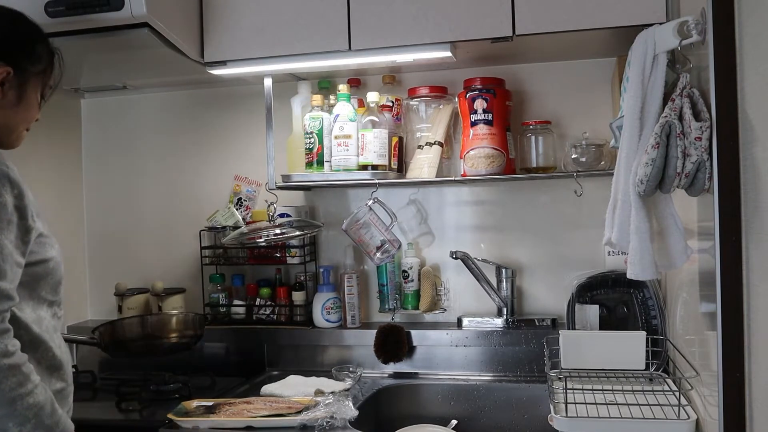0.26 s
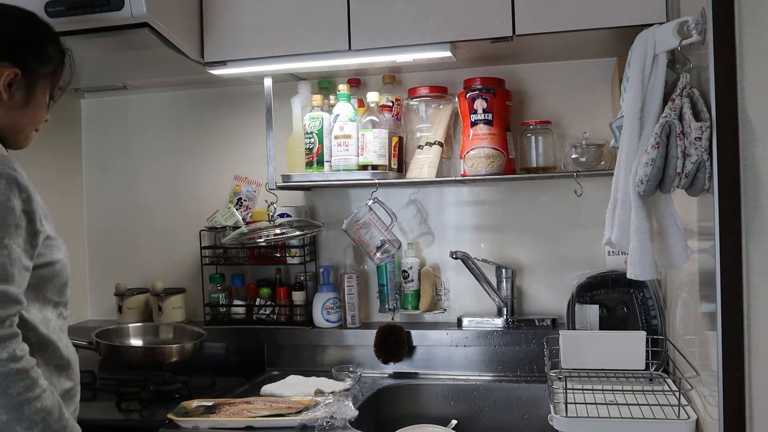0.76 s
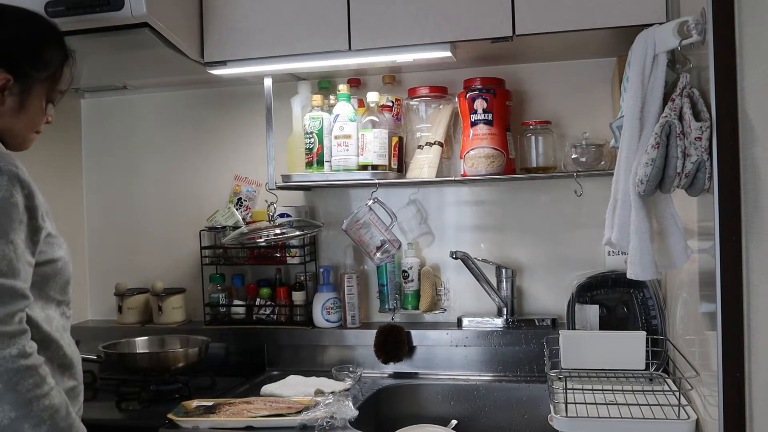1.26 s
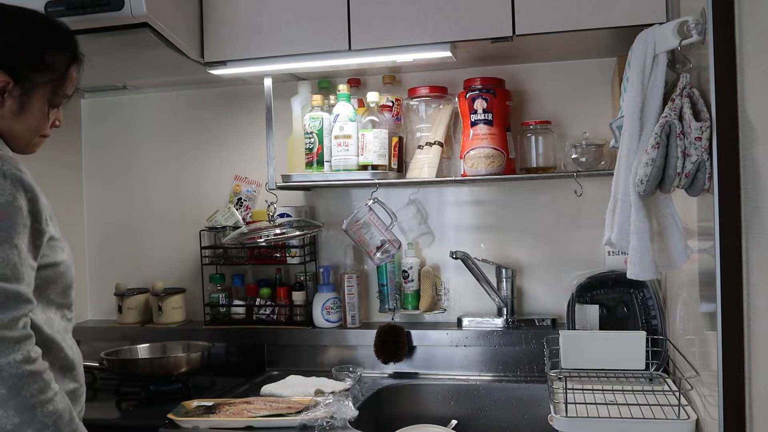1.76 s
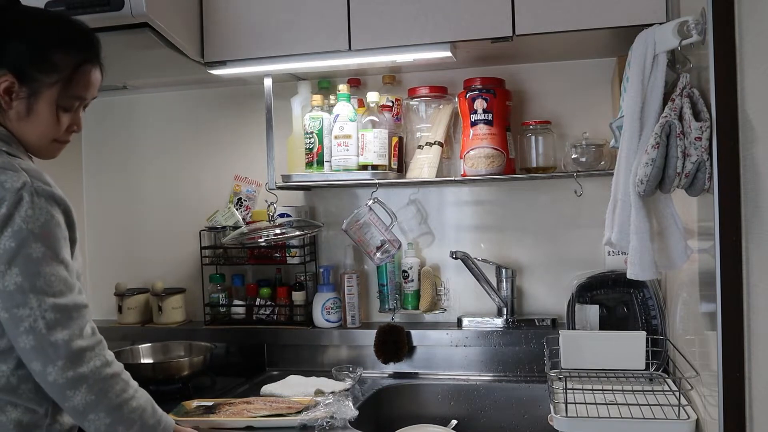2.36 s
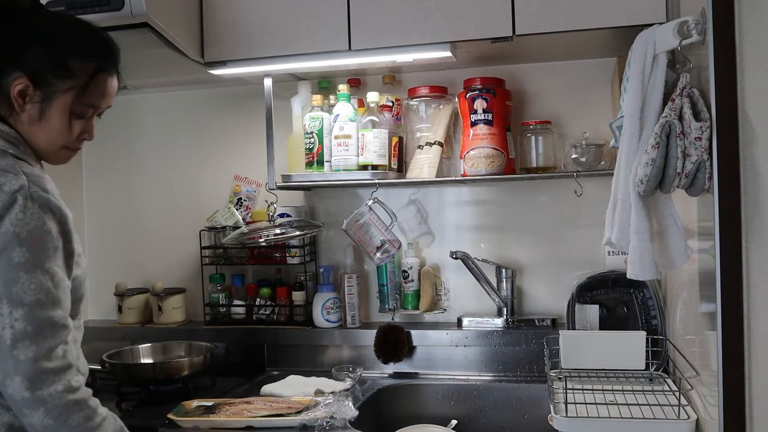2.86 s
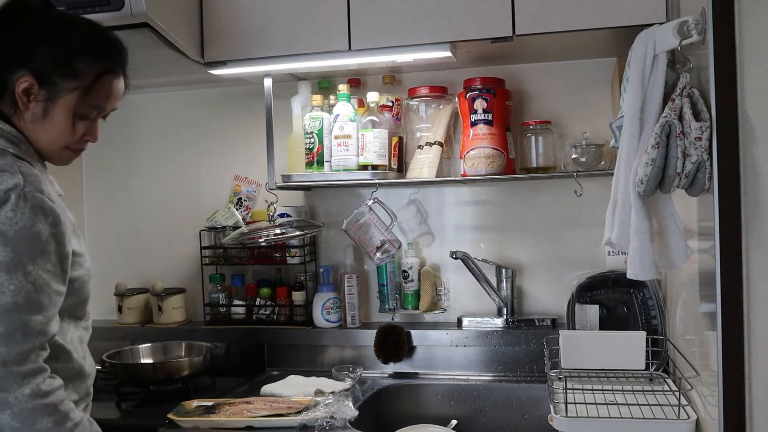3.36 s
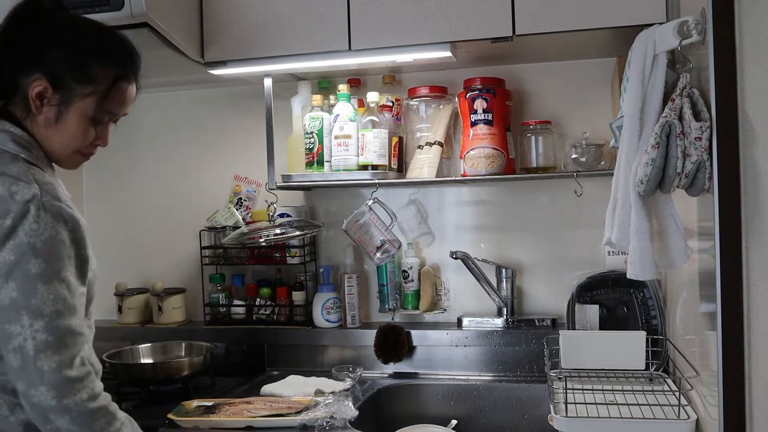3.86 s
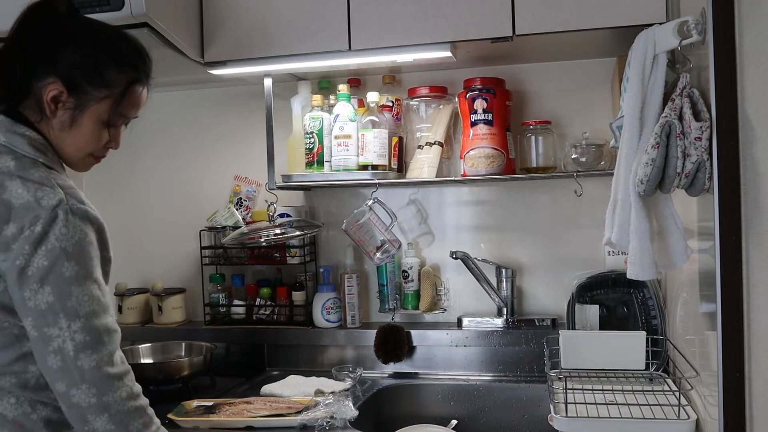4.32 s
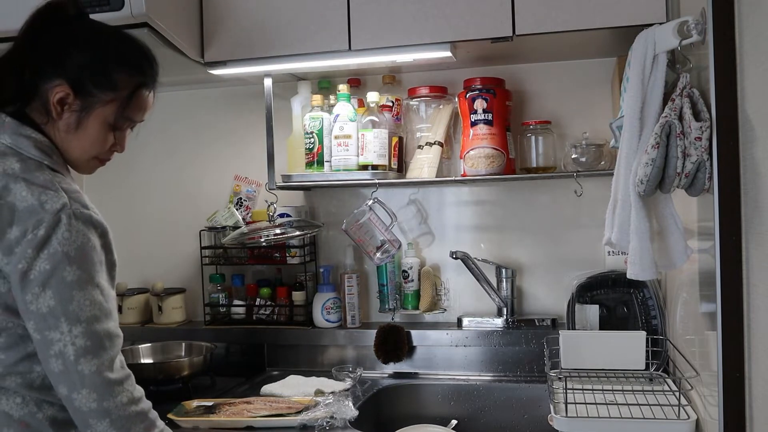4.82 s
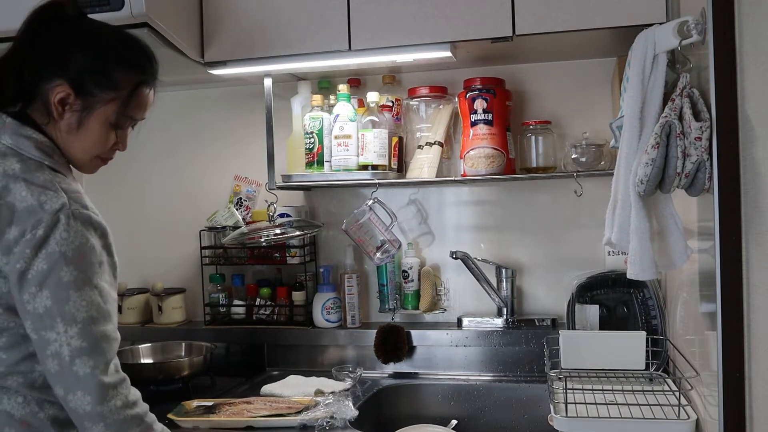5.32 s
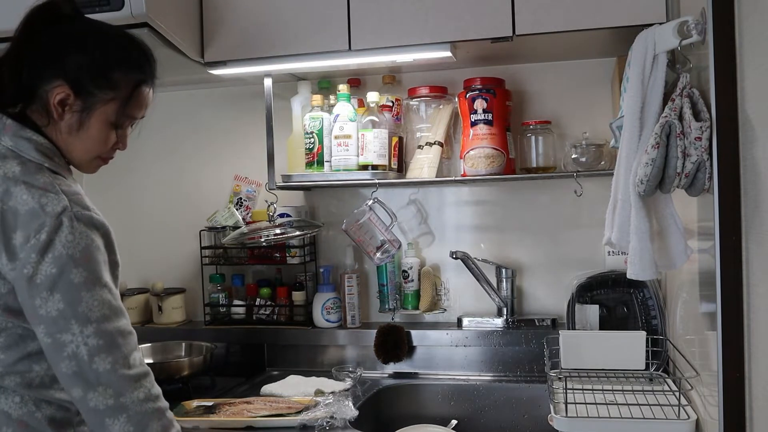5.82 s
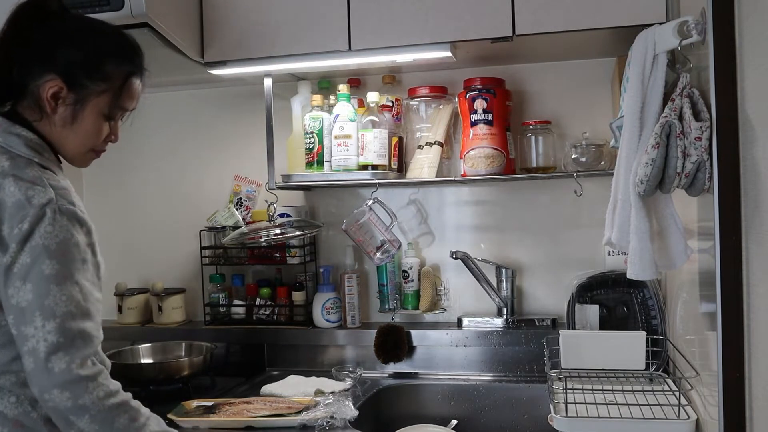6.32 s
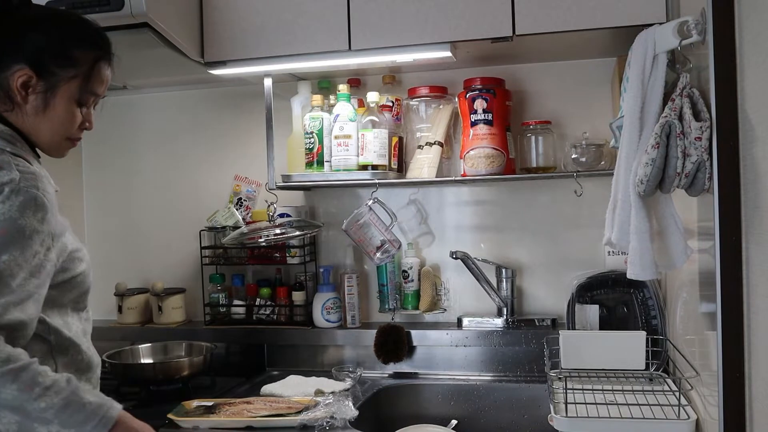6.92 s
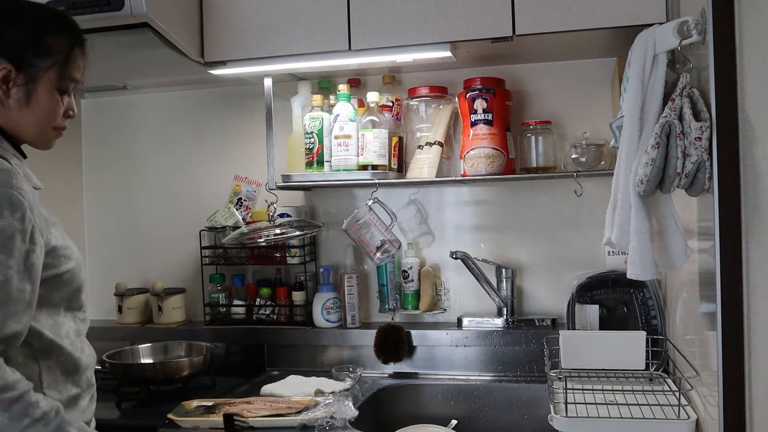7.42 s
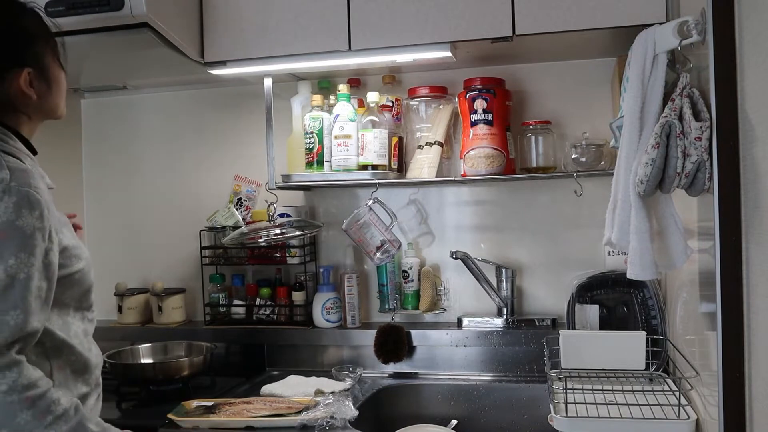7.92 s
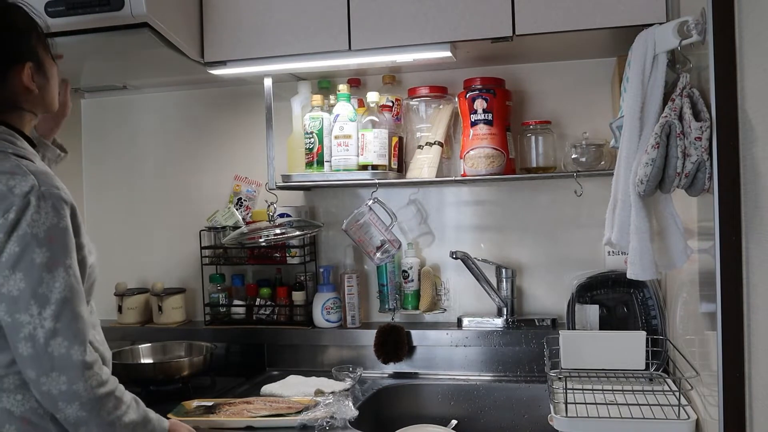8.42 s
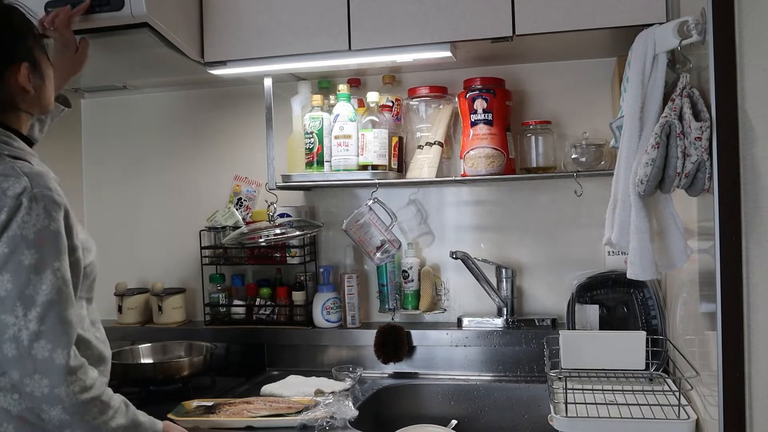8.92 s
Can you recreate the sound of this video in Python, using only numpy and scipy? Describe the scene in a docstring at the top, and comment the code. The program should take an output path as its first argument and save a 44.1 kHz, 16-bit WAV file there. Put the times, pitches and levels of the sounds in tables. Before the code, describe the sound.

Pan clanks and scrapes onto a stove grate, drawer rumbles open, cutlery is rummaged, then a heavy closing thump and a fan switching on.

```python
"""A small hard-walled kitchen, heard by two close microphones over a faint hiss of appliances.
A steel pan is set on the hob grate, a deep drawer rolls open, utensils are rummaged and dropped in it,
it rolls shut with a thump and a switch starts the extractor fan. Blows are noise bursts that start decaying
modes; scrapes, rolling and air are shaped noise; squeaks and motor hum are sines; the room adds diffuse echo."""
import sys
import numpy as np
from scipy import signal
from scipy.fft import rfft, irfft, next_fast_len
from scipy.io import wavfile

SR = 44100
rng = np.random.default_rng(int(sys.argv[2]) if len(sys.argv) > 2 else 0)


def dump(signal):
    """Clip the signal to [-1, 1] and save it as 16-bit WAV at the path in sys.argv[1]."""
    limited = np.clip(np.atleast_2d(signal).T, -1, 1)
    pcm = np.round(limited * 32767).astype(np.int16)
    wavfile.write(sys.argv[1], SR, pcm)


N = 404838


def undb(db):
    """Decibel definition: 20 dB is a factor of ten in amplitude."""
    return 10 ** (np.asarray(db) / 20)


def on_log(table, hz):
    """Logarithmic pitch: interpolate a (frequency [Hz], value) table on a log-frequency axis."""
    at, value = np.transpose(table)
    return np.interp(np.log(np.maximum(hz, 1)), np.log(np.maximum(at, 1)), value)


def colour(x, table, size=4096):
    """Minimum phase: folding the cepstrum of a gain table gives a causal filter, scaled to unit power."""
    bins_hz = np.arange(size // 2 + 1) * SR / size
    cepstrum = irfft(np.log(undb(on_log(table, bins_hz))))
    cepstrum[1:size // 2] *= 2
    cepstrum[size // 2 + 1:] = 0
    taps = irfft(np.exp(rfft(cepstrum)))
    taps = taps / np.sqrt(np.sum(taps ** 2))
    return signal.oaconvolve(x, taps)[:len(x)]


def ring(x, modes):
    """Modal superposition: every push starts a decaying sine in each mode."""
    out = 0
    for hz, db, t60 in modes:
        radius, angle = np.exp(-np.log(1000) / (t60 * SR)), 2 * np.pi * hz / SR
        poles = [1, -2 * radius * np.cos(angle), radius * radius]
        out = out + signal.lfilter([0, undb(db) * np.sin(angle)], poles, x)
    return out


def cut(x, hz, kind):
    """Second-order Butterworth filtering: a maximally flat pass band."""
    return signal.sosfilt(signal.butter(2, hz, kind, fs=SR, output="sos"), x)


def gain_curve(s, db):
    """Piecewise exponential envelope: gain follows dB points and is practically silent outside them."""
    return undb(np.interp(np.arange(N) / SR, s, db, left=-150, right=-150))


def swell(s, db, rise_db_s, fall_db_s):
    """Exponential growth and decay: gain climbs to db at time s, then sinks, at steady dB per second."""
    t = np.arange(N) / SR - s
    return undb(db + np.where(t < 0, rise_db_s * t, -fall_db_s * t))


def grit(scatter_db):
    """Asperity contact: dense tiny impacts of very uneven size, with unit power."""
    x = rng.standard_normal(N) * undb(scatter_db * rng.exponential(size=N))
    return x / np.sqrt(np.mean(x ** 2))


def spread(x, table):
    """Interchannel coherence: weight the side part by frequency and advance it a quarter cycle."""
    size = next_fast_len(len(x))
    bins_hz = np.arange(size // 2 + 1) * SR / size
    return irfft(1j * rfft(x, size) * undb(on_log(table, bins_hz)), size)[:len(x)]


CONTACT_LAW = 0.31  # dB of longer contact for each dB of weaker blow
NOTE_DB, NOTE_Q = 3.5, 5  # broad band lifted around the note of the piece struck
BASE_HZ, BASE_SHARE = 2500, .25  # a resting pan's modes below this pitch keep this share of their t60
FLUTTER, FLUTTER_HZ = .75, 28  # depth of each mode's level flutter, and base of its rate
WAVER_RAD = .9  # loose contact makes the phase, and so the pitch, of each ring waver


def strike(blows, crack, modes, contact_s, crack_db, ring_db, rests_s=0, shares=(1, 1), under=(), rise_s=0.00038):
    """Impact excitation: each blow is a short rough contact; returns its crack and the ring of its modes.

    After rests_s the `under` modes join in; shares scale every t60 before and after that moment."""
    size = int(.7 * SR)
    own, modes = len(modes), list(modes) + list(under)
    cracks, rings = np.zeros(N + size), np.zeros(N + size)
    t = np.arange(size) / SR
    rough = rng.standard_normal(N + size)
    chance = rng.random((len(blows), 4, len(modes)))
    fade = np.minimum(1, 10 * (1 - t / t[-1]))
    rise = 1 - np.exp(-t / rise_s)
    for (s, db, thud_db, fizz_db, own_db, *note), (phase, spot, apart, lag) in zip(blows, chance):
        i, resting = int(s * SR), s > rests_s
        contact = max(contact_s, .001) * undb(-CONTACT_LAW * db)
        push = (rough[i:i + size] * rise * np.exp(-t / contact))[:size // 3]
        # a soft heavy contact has more thud, a hard light one more fizz
        low, high = cut(push, 356, "low"), cut(push, 2200, "high")
        push = push + (undb(thud_db) - 1) * low + (undb(fizz_db) - 1) * high
        for hz in note:
            band = signal.lfilter(*signal.iirpeak(hz, NOTE_Q, fs=SR), push)
            push = push + undb(NOTE_DB + own_db) * band
        cracks[i:i + len(push)] += undb(db + crack_db) * colour(push, crack)

        sounding = modes if resting else modes[:own]
        for (hz, mode_db, t60), turn, luck, gap, late in zip(sounding, phase, spot, apart, lag):
            damped_base = 0 < rests_s < s and hz < BASE_HZ
            t60 *= shares[resting] * (BASE_SHARE if damped_base else 1)
            # the spot that is hit favours some modes over others
            mode_db += 4 * (luck - .5) + thud_db * (hz < 400) + fizz_db * (hz > 3000)
            n = min(size, int(1.3 * t60 * SR))
            waver = WAVER_RAD * np.sin(2 * np.pi * (FLUTTER_HZ * (0.403 + late) * t[:n] + gap))
            decay = np.exp(-np.log(1000) * t[:n] / t60)
            tone = decay * np.sin(2 * np.pi * (hz * t[:n] + turn) + waver)
            tone *= 1 + FLUTTER * np.sin(2 * np.pi * (FLUTTER_HZ * (0.26 + .75 * gap) * t[:n] + late))
            rings[i:i + n] += undb(db + ring_db + own_db + mode_db) * tone * rise[:n] * fade[:n]
    return np.array([cracks[:N], rings[:N]])


# Spectrum of the hiss, common to both microphones: (frequency [Hz], relative density [dB per Hz])
HISS_MID = [(12, -59), (20, -10.5), (59, 1.5), (112, -2.5), (251, -8), (280, -10.5), (331, -8),
            (370, -12.5), (610, -12.5), (926, -15), (2810, -22.5), (9830, -37.5), (15300, -51)]
# Side part of the hiss: (frequency [Hz], left minus right over the common part [dB])
HISS_SIDE = [(60, -24), (110, -16), (200, -2.5), (380, 3.5), (700, 4), (1280, 6), (2370, 5.5), (4370, 6.5),
             (8060, 6.5), (14900, 9)]
HISS_DB = -53.5
WHINE_HZ, WHINE_WIDTH_HZ, WHINE_DB = 2772, 31, -70


def hiss():
    """Stationary noise: steady hiss with a narrow whine; returns the common and left-minus-right parts."""
    whine = signal.iirpeak(WHINE_HZ, WHINE_HZ / WHINE_WIDTH_HZ, fs=SR)
    lift = undb(WHINE_DB) * np.sqrt(SR / (np.pi * WHINE_WIDTH_HZ))  # makes up for the narrow band
    mid, side = (undb(HISS_DB) * colour(rng.standard_normal(N), HISS_MID)
                 + lift * signal.lfilter(*whine, rng.standard_normal(N)) for _ in range(2))
    return mid, spread(side, HISS_SIDE)


# Blows on the drawer: (time [s], level [dB], thud [dB], fizz [dB], ring [dB])
# In all blow tables thud is the gain of the lows, fizz of the highs, ring of the modes.
DRAWER_BLOWS = [(0.594, -44.5, -20, 0, 14), (2.346, -39.5, 15, -24, 0), (2.36, -37, -6, -23, 3),
                (2.488, -25.5, 15.5, -12, -10), (2.57, -25.5, 7.5, -5, -4), (2.63, -21.5, 3.5, -5, -4),
                (2.655, -45, -3, -8, 1), (2.737, -13, -1, -16, -25), (2.775, -22.5, 8.5, 5, -12),
                (2.845, -45, -2, -3, -5), (2.872, -26, 10.5, -5, -12), (3.648, -40.5, -46, 6, 11.5),
                (7.865, -8.5, -1, -8, -9), (7.89, -12, -3.5, -7, -3), (8.0, -14.5, 3.5, -2, -7),
                (8.321, 4, -3, -2.5, -2), (8.342, -11.5, 1.5, -6, 0.5), (8.356, -6, -8, 0, 7.5),
                (8.372, -14, -4, 0, 9), (8.39, -38, 2, 1, 2)]
# Modes of the drawer box: (frequency [Hz], level [dB], t60 [s])
DRAWER_MODES = [(76.5, -7.5, 0.12), (76.6, 3.5, 0.38), (104.3, 0.5, 0.11), (121, 0, 0.07),
                (162.4, 8, 0.071), (218, 2.5, 0.092), (291.3, -1.5, 0.2), (352.6, -8.5, 0.19),
                (440, -19, 0.15), (518, -18, 0.17), (606, -10.5, 0.14), (704, -16, 0.28)]
# Spectrum of its contact: (frequency [Hz], relative density [dB per Hz])
DRAWER_CRACK = [(18, -3), (30, -7), (64, 7), (255, 1), (298, -3.5), (477, -11), (687, -11.5), (965, -19),
                (7980, -45), (15300, -57)]


def drawer_blows():
    """Panel resonance: knocks and the closing thump excite the low modes of the drawer box."""
    return strike(DRAWER_BLOWS, DRAWER_CRACK, DRAWER_MODES, contact_s=0.0066, crack_db=-4.0, ring_db=-11.0,
                  rise_s=0.0011)


# Blows of the pan: (time [s], level [dB], thud [dB], fizz [dB], ring [dB])
PAN_BLOWS = [(1.45, -31.5, -28, 2.5, 17), (1.461, -39.5, -19.5, 1.5, 15.5), (1.757, -13.5, -6.5, 0.5, 6),
             (1.766, -12, -9.5, -0.5, 2.5), (1.799, -11.5, 13, -3, -1), (1.929, -20, -12.5, 10, -11.5),
             (1.939, -3, -5.5, 4, -3.5), (1.965, -37.5, -20, 11, -12.5), (2.012, -23, -7, 3, 3.5),
             (2.047, -15.5, 7.5, -1.5, -1), (2.12, -28.5, -9.5, -13, 9.5)]
# Modes of the pan before support damping: (frequency [Hz], level [dB], t60 [s])
PAN_MODES = [(353, -0.5, 0.16), (667, -23.5, .8), (880, -14, .6), (1096, -13, 0.61), (1180, -17.5, .6),
             (1346, -22.5, .15), (1584, -16.5, .7), (2060, -10, 0.2), (2261, -3, .12), (2309, -1, .6),
             (2848, -17, .5), (3219, -11, .7), (3252, -15, .6), (3596, -7.5, .55), (3850, -18, .3),
             (4140, -5, .42), (4660, -6, .42), (5480, -17, .3), (5809, -11, .2), (7040, -14, .25),
             (9880, -30, 0.17), (11520, -31, 0.35), (11680, -36, 0.26)]
# Modes of the grate bars, which ring once the pan has landed: (frequency [Hz], level [dB], t60 [s])
BAR_MODES = [(2702, -12, .2), (3063, -12, .35), (3349, -6, .6), (4043, -8, .5), (4204, -8, .2),
             (4468, -18, 1.1), (4511, -22, .6), (4790, -20, .6), (5734, -7, .25), (6207, -12, .45),
             (6325, -14, .27), (7220, -17, .25), (8070, -15, .3), (10280, -20, .15), (10970, -18.5, 0.12),
             (12300, -25, .15)]
# Spectrum of steel on the grate: (frequency [Hz], relative density [dB per Hz])
PAN_CRACK = [(47, -59.5), (80, -33), (341, 13), (425, -6), (919, 11), (2530, 3), (3290, 6.5), (4700, -1.5),
             (5150, -5.5), (5900, -3), (12600, -23.5), (15300, -39.5)]
PAN_RESTS_S = 1.7
PAN_HELD_SHARE, PAN_REST_SHARE = .65, .85  # share of each t60 in the air, then on the grate


def pan_blows():
    """Support damping: the pan rings in the air, then the grate damps its base and rings with it."""
    return strike(PAN_BLOWS, PAN_CRACK, PAN_MODES, contact_s=0.0043, crack_db=-3.0, ring_db=-14.0,
                  rests_s=PAN_RESTS_S, shares=(PAN_HELD_SHARE, PAN_REST_SHARE), under=BAR_MODES, rise_s=0.001)


# Slides of the pan on the grate: (loudest time [s], scrape level [dB], hum level [dB])
SLIDES = [(1.54, -42.5, -49.5), (1.648, -43.5, -44.5), (1.814, -32, -46), (1.946, -34, -52.5),
          (2.058, -28.5, -42.5)]
# Spectrum of the scrape: (frequency [Hz], relative density [dB per Hz])
SCRAPE = [(150, 0.5), (400, 1.5), (1100, 6.5), (1700, 0.5), (2500, -1.5), (8000, -38.5)]
SLIDE_RISE_DB_S, SLIDE_FALL_DB_S = 200, 173
HUM_RISE_DB_S, HUM_FALL_DB_S = 196, 76
GRATE_HZ, GRATE_T60 = 213, 0.2
SCRAPE_RING_DB = -4  # the pan's modes, over the scrape


def pan_slides():
    """Sliding friction: the scrape of steel on iron keeps one low bar mode and the pan's modes going."""
    hum = ring(rng.standard_normal(N), [(GRATE_HZ, 0, GRATE_T60)])
    hum_gain = sum(swell(s, db, HUM_RISE_DB_S, HUM_FALL_DB_S) for s, _, db in SLIDES)
    scrape_gain = sum(swell(s, db, SLIDE_RISE_DB_S, SLIDE_FALL_DB_S) for s, db, _ in SLIDES)
    rub = grit(3.42)
    # rubbing damps the ring and evens it out
    rubbed = [(hz, min(db, -13), .45 * t60) for hz, db, t60 in PAN_MODES[1:]]
    pan = ring(scrape_gain * rub, rubbed) / ring(rub, rubbed).std()
    scrape = scrape_gain * colour(rub, SCRAPE)
    return hum_gain * hum / hum.std() + scrape + undb(SCRAPE_RING_DB) * pan


# Drawer on its runners, one list opening and one closing: (time [s], rumble level [dB])
ROLLS = [
    [(2.315, -73), (2.345, -30), (2.37, -43), (2.48, -33), (2.5, -29.5), (2.72, -28), (2.8, -28.5),
     (2.99, -31), (3.06, -36), (3.152, -46.5), (3.42, -68)],
    [(7.45, -73), (7.6, -42), (7.768, -30), (7.89, -25.5), (8.005, -26.5), (8.09, -30.5), (8.19, -33),
     (8.3, -33.5), (8.33, -41)],
]
# Spectrum of the rails: (frequency [Hz], relative density [dB per Hz])
RAIL_HISS = [(290, -19), (500, -23), (655, -12), (847, -9.5), (2760, -15.5), (10800, -34), (13000, -39),
             (15000, -101)]
RAIL_HISS_DB = -18.5  # over the rumble


def drawer_roll():
    """Rolling excitation: uneven rollers shake the modes of the drawer box while the rails hiss."""
    bumps = grit(3.3)
    box = ring(bumps, [(hz, db, 0.68 * t60) for hz, db, t60 in DRAWER_MODES])
    box /= np.sqrt(np.mean(box ** 2))
    rails = colour(grit(2.0), RAIL_HISS)
    gain = sum(gain_curve(*np.transpose(roll)) for roll in ROLLS)
    return gain * (box + undb(RAIL_HISS_DB) * rails)


# Plastic clicks of drawer and fan switch: (time [s], level [dB], thud [dB], fizz [dB], ring [dB])
CLICKS = [(2.364, -34.5, 2, -29, -14), (2.989, -34.5, -22, 3.5, -8), (8.748, -41, 10, 0, 3),
          (8.798, -22.5, 1, 6.5, 4.5), (9.065, -50.5, 3, 2.5, -2)]
# Modes of the clicking parts: (frequency [Hz], level [dB], t60 [s])
SWITCH_MODES = [(510, 5, 0.2), (716, 9, .3), (861, 10, .25), (1292, 2, .3), (2266, 0, .3), (2600, 3, .6),
                (4500, -3, .2)]
# Spectrum of the click: (frequency [Hz], relative density [dB per Hz])
SWITCH_CRACK = [(88, -43), (150, -13.5), (427, -6), (778, -2), (1150, -8.5), (2530, -16), (6290, -28),
                (10600, -25), (15300, -44)]


def clicks():
    """Impulsive contact: small plastic parts snap and ring faintly."""
    return strike(CLICKS, SWITCH_CRACK, SWITCH_MODES, contact_s=0.0041, crack_db=3.0, ring_db=-27.5, rise_s=0.0019)


# Blows of utensils: (time [s], level [dB], thud [dB], fizz [dB], ring [dB], note of the piece [Hz])
UTENSIL_BLOWS = [(3.917, -45, 4, -11, 3, 644), (4.771, -26, 3, 0, -3, 1080), (4.844, -6, 0, -1.5, -4, 580),
                 (4.872, -38, 18, -6.5, 4, 1140), (4.921, -15.5, 2.5, 11, -4, 2820),
                 (4.984, -13, -2.5, 5, -5.5, 2850), (5.02, -41, 16, -13, 3, 1940),
                 (5.477, -39.5, 14.5, -1, -5, 360), (5.537, -23.5, -12, -1, -13, 1040),
                 (5.654, -25, 1, -15, -2, 1130), (5.694, -29.5, -16, 7, 6, 555),
                 (5.729, -36.5, 7.5, -3, -5, 950), (5.805, -17, 7, 2, 1.5, 363),
                 (5.845, -17, 4, 10.5, -5, 354), (5.866, -12, -6, -12, -16, 644),
                 (5.913, -11, -6, -2, -2, 656), (5.97, -19, -29, -7, 6, 910), (5.977, -3, 3, 2, -0.5, 860),
                 (6.027, -27, -8, -8, 3, 890), (6.042, -21, -8, -9, 0, 820), (5.828, -16.5, -5, 2, 1, 2100),
                 (5.885, -32, -11, 2, 8, 3000), (5.932, -21, 1, -3, -11, 1000),
                 (6.235, -28.5, -9, -1, -11, 3000), (6.177, -24, 11, 10, 8, 353),
                 (6.21, -23.5, -16, 1, 8, 634), (6.356, -26.5, 6, 6.5, -10, 595),
                 (6.381, -28, -2, -20.5, -4, 1880), (6.405, -17, 6, -38, -3, 845),
                 (6.472, -23, -19, -8, -2, 795)]
# Modes of the utensils: (frequency [Hz], level [dB], t60 [s])
UTENSIL_MODES = [(237, 1.5, 0.066), (389.4, 6, 0.21), (560.7, 3.5, 0.34), (655, 6, 0.36), (803, -11, 0.59),
                 (920, 0, 0.39), (1059, 5.5, 0.2), (1320, -5.5, 0.17), (1710, -12.5, .3), (2030, -6, .25),
                 (2665, -0.5, 0.19), (3010, -7, 0.22)]
# Spectrum of their contact: (frequency [Hz], relative density [dB per Hz])
UTENSIL_CRACK = [(29, -73), (50, 1), (127, -11.5), (210, 1.5), (274, -8), (365, -2), (475, -7), (865, -6),
                 (1430, -8), (11200, -32.5), (15300, -52)]


def utensil_blows():
    """Modal impact: each piece dropped or knocked lifts a band around its own note."""
    return strike(UTENSIL_BLOWS, UTENSIL_CRACK, UTENSIL_MODES, contact_s=0.0032, crack_db=-1.0, ring_db=-22.0,
                  rise_s=0.0011)


# Blows of cutlery: (time [s], level [dB], thud [dB], fizz [dB], ring [dB])
CUTLERY_BLOWS = [(4.076, -17, 3, 13, -24), (4.104, -7.5, 3.5, 4.5, -6), (4.138, -6, -12, 9.5, -4.5),
                 (4.208, -36, 10, 14, 20.5), (4.451, -25, 1, 5.5, -3), (4.475, -9.5, 4.5, 4, -7.5),
                 (4.508, -29.5, 10, 11.5, 13.5), (4.575, -36, -10, 0, 6)]
# Modes of the cutlery: (frequency [Hz], level [dB], t60 [s])
CUTLERY_MODES = [(220, -6, .12), (371, -4, .15), (651, -1, .4), (735, -6, .3), (818, -12, .9), (880, 0, .3),
                 (960, -2, .3), (1109, -6, .44), (1696, -4, .3), (2035, -5, .2), (2315, -9, .25),
                 (2422, -6, .25), (2950, -9, .2), (10820, -19, .1), (10940, -16, .2), (11060, -17, .16),
                 (11190, -20, .1), (13280, -25, .16), (13450, -27, .12), (13630, -25, .16)]
# Spectrum of its contact: (frequency [Hz], relative density [dB per Hz])
CUTLERY_CRACK = [(29, -51), (50, -7), (649, 1), (697, -11), (865, 3.5), (1270, -10), (1650, -7),
                 (8420, -29.5), (11000, -25.5), (13900, -40), (15300, -111)]


def cutlery_blows():
    """Bar vibration: struck cutlery rings in many modes, some above 10 kHz."""
    return strike(CUTLERY_BLOWS, CUTLERY_CRACK, CUTLERY_MODES, contact_s=0.0037, crack_db=-2.5, ring_db=-19.0,
                  rise_s=0.0014)


# Utensils dragged over each other: (loudest time [s], level [dB])
DRAGS = [(4.131, -34.5), (4.471, -49), (4.802, -38), (4.838, -34.5), (5.7, -44), (5.82, -37),
         (5.855, -28.5), (6.15, -36)]
DRAG_RISE_DB_S, DRAG_FALL_DB_S = 236, 124


def rummage():
    """Friction noise: dense scratchy contacts, coloured like the single blows."""
    gain = sum(swell(s, db, DRAG_RISE_DB_S, DRAG_FALL_DB_S) for s, db in DRAGS)
    return colour(gain * grit(3.5), UTENSIL_CRACK)


# Edges dragged over the tray: (start [s], end [s], first pitch [Hz], last pitch [Hz], waver [Hz], level [dB])
SQUEAKS = [(5.69, 5.79, 1885, 1885, 15, -47), (5.725, 5.81, 942, 942, 12, -35),
           (5.86, 5.96, 2640, 2620, 50, -37), (5.97, 6.05, 1150, 800, 60, -24),
           (6.18, 6.28, 380, 900, 90, -36), (6.34, 6.47, 1870, 1820, 70, -47),
           (6.41, 6.58, 850, 820, 35, -41), (4.14, 4.21, 960, 930, 40, -29),
           (4.85, 4.9, 1130, 1130, 40, -28), (5.02, 5.08, 1995, 1995, 40, -42)]
SQUEAK_THROB_DB = 4


def squeaks():
    """Stick-slip: a dragged edge sings on one wavering note that swells and fades."""
    out = np.zeros(N)
    for start, end, first_hz, last_hz, width_hz, db in SQUEAKS:
        i, n = int(start * SR), int((end - start) * SR)
        waver, throb = cut(rng.standard_normal((2, SR // 2)), 90, "low")[:, -n:]
        hz = np.linspace(first_hz, last_hz, n) + width_hz * waver / waver.std()
        note = np.sqrt(2) * np.sin(2 * np.pi * np.cumsum(hz) / SR)
        level = undb(db + SQUEAK_THROB_DB * throb / throb.std())
        out[i:i + n] += level * note * signal.windows.tukey(n, .5)
    return out


# Blow on a tin: (time [s], level [dB], thud [dB], fizz [dB], ring [dB])
TIN_BLOWS = [(6.66, -11, -2, -4.5, 4.5)]
# Modes of the tin: (frequency [Hz], level [dB], t60 [s])
TIN_MODES = [(590, -3.5, 0.27), (956, -29, 0.34), (1176, -5, 0.46), (1480, 2.5, 0.35), (1533, -2, 0.33),
             (1630, 1, 0.4), (2010, -5, 0.48), (2196, -6, .4), (2492, -6, .4), (2605, -4, .6),
             (2720, -11, .75), (2900, -10, .5), (3176, -7, .65), (3570, -8, .55), (3500, -9, 0.36),
             (3980, -9, 0.45), (4290, -17, 0.49), (5400, -14, .22)]
# Spectrum of its contact: (frequency [Hz], relative density [dB per Hz])
TIN_CRACK = [(47, -61), (80, -28), (151, -4), (306, -9), (398, -22), (1170, -8.5), (1280, -12), (2580, -12),
             (6220, -35), (15300, -69)]


def tin_blow():
    """Shell vibration: one long contact sets the close modes of a tin ringing."""
    return strike(TIN_BLOWS, TIN_CRACK, TIN_MODES, contact_s=0.02, crack_db=-3.0, ring_db=-18.0)


# Footfalls: (time [s], level [dB], thud [dB], fizz [dB], ring [dB])
FOOTFALLS = [(7.305, -28.5, 12.5, -0.5, -1), (7.385, -43, -5, 0, 5)]
# Modes of the floor: (frequency [Hz], level [dB], t60 [s])
FLOOR_MODES = [(56, -13, 0.025), (86, -32, 0.17)]
# Spectrum of the step: (frequency [Hz], relative density [dB per Hz])
FOOT_CRACK = [(24, -45), (40, -7), (75, 6), (227, -33), (253, -49.5), (886, -47), (1000, -33),
              (1300, -63.5), (2200, -120)]


def footfalls():
    """Structure-borne sound: each step excites the low, heavily damped floor modes."""
    return strike(FOOTFALLS, FOOT_CRACK, FLOOR_MODES, contact_s=0.004, crack_db=-13.0, ring_db=-4.0)


SHUDDER_S = 8.36
SHUDDER_DB, SHUDDER_FAST_DB_S = -44, 150
SHUDDER_TAIL_DB, SHUDDER_TAIL_DB_S = -29, 23.5
RATTLE_DB = -18.5  # loose things in the drawer, over the slow tail


def shudder():
    """Exponential decay: cabinet and floor shake on after the thump in a slow tail with a weaker fast part, and
    loose things rattle."""
    low = ring(rng.standard_normal(N), FLOOR_MODES)
    sudden = 1e5  # rise, dB per s
    fast = swell(SHUDDER_S, SHUDDER_DB, sudden, SHUDDER_FAST_DB_S)
    tail = swell(SHUDDER_S, SHUDDER_TAIL_DB, sudden, SHUDDER_TAIL_DB_S)
    rattle = undb(RATTLE_DB) * tail * colour(grit(3.2), UTENSIL_CRACK)
    return (fast + tail) * low / low.std() + rattle


FAN_ON_S, FAN_HZ, FAN_RISE_DB_S = 8.84, 118, 504
FAN_HUM_DB, FAN_AIR_DB = -55, -54  # once settled
FAN_SURGE_DB, FAN_SURGE_S = 18.5, 0.12  # extra hum at the start, and its time constant


def fan():
    """Starting transient: motor hum and a rush of air start loud and settle exponentially."""
    t = np.arange(N) / SR
    on = swell(FAN_ON_S, 0, FAN_RISE_DB_S, 0)
    surge_db = FAN_SURGE_DB * np.exp(-np.maximum(t - FAN_ON_S, 0) / FAN_SURGE_S)
    hum = np.sqrt(2) * np.sin(2 * np.pi * FAN_HZ * t)
    air = colour(rng.standard_normal(N), [(100, -14.0), (300, 13.5), (800, 1.0), (3000, -7.5), (12000, -27.5)])
    return on * (undb(FAN_HUM_DB + surge_db) * hum + undb(FAN_AIR_DB + surge_db / 2) * air)


# Reverberation time of the kitchen: (frequency [Hz], t60 [s])
ROOM_T60 = [(60, 0.8), (250, 0.35), (1000, 0.54), (3000, 0.4), (7000, 0.266), (14000, 0.13)]


def echoes():
    """Diffuse reverberation: a unit-energy noise response whose half octaves die at their own rates."""
    t, out = np.arange(int(.8 * SR)) / SR, 0
    for hz in 45 * 2 ** np.arange(0, 8.6, .5):
        sos = signal.butter(2, [hz / 2 ** .25, hz * 2 ** .25], "band", fs=SR, output="sos")
        decay = np.exp(-np.log(1000) * t / on_log(ROOM_T60, hz))
        band = signal.sosfilt(sos, rng.standard_normal(len(t))) * decay
        out = out + band * np.sqrt(hz / np.sum(band ** 2))
    out = out * (1 - np.exp(-t / 0.00016))  # soft onset
    return out / np.sqrt(np.sum(out ** 2))


# Side part of the room sound: (frequency [Hz], left minus right over the common part [dB])
ROOM_SIDE = [(60, -56), (110, -44.5), (200, -25.5), (380, -10), (700, -7.5), (1280, -2.5), (2370, 2),
             (4370, 5), (8060, 6.5), (14900, 5)]
DIRECT_DB, RING_ECHO_DB = -6, -10  # direct part of brief sounds; echo send of lasting ones
LOW_CUT_HZ = 57


def room(brief, lasting):
    """Direct and reverberant field: brief sounds are heard mostly as echo, lasting ones mostly direct."""
    direct = undb(DIRECT_DB) * brief + lasting
    to_walls = brief + undb(RING_ECHO_DB) * lasting
    mid, side = (direct + signal.oaconvolve(to_walls, echoes())[:N] for _ in range(2))
    # small room and close microphones carry little deep bass
    mid, side = (cut(cut(part, LOW_CUT_HZ, "high"), LOW_CUT_HZ, "high") for part in (mid, side))
    return mid, spread(side, ROOM_SIDE)


def scene():
    """Linear superposition: all sources add in the room, over the hiss; returns left and right."""
    hiss_mid, hiss_side = hiss()
    cracks, rings = (drawer_blows() + pan_blows() + clicks() + utensil_blows() + cutlery_blows()
                     + tin_blow() + footfalls())
    brief = cracks + rummage()
    lasting = rings + pan_slides() + drawer_roll() + squeaks() + shudder() + fan()
    mid, side = room(brief, lasting)
    mid, side = mid + hiss_mid, side + hiss_side
    return np.array([mid + side, mid - side])


TOP_HZ = 15500


def record(dry):
    """Clipping and band limiting: peaks over full scale are flattened, then the top is cut."""
    low_pass = signal.ellip(10, .2, 85, TOP_HZ, fs=SR, output="sos")
    return signal.sosfilt(low_pass, np.clip(dry, -1, 1))


dry = scene()
out = record(dry)
dump(out)
```